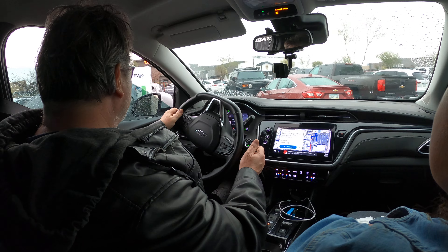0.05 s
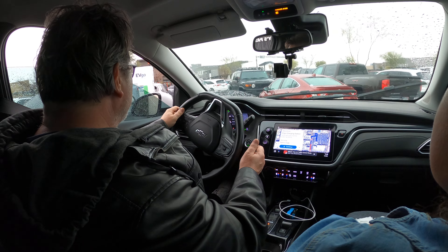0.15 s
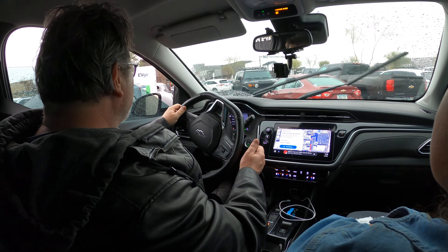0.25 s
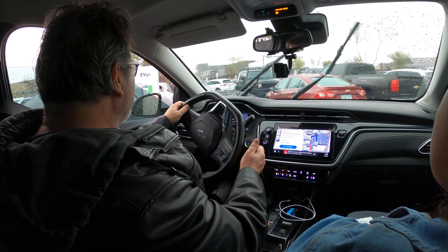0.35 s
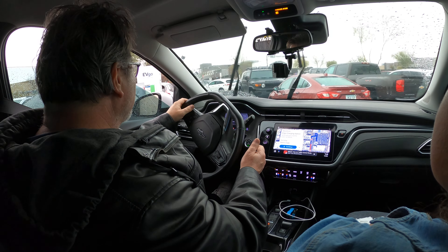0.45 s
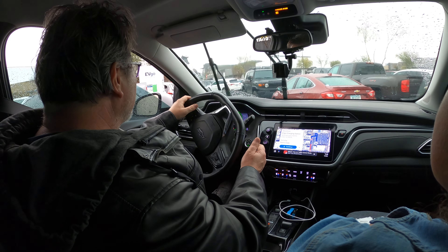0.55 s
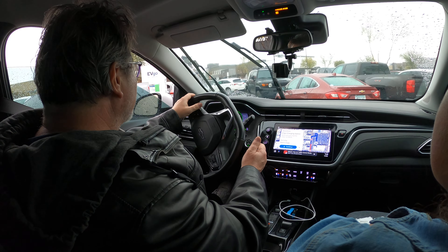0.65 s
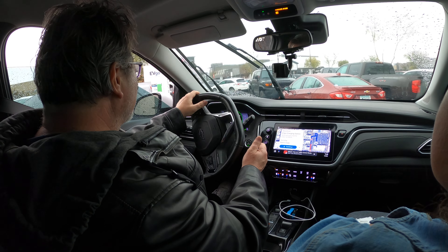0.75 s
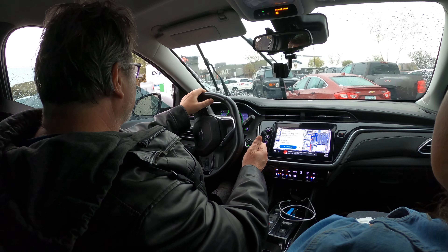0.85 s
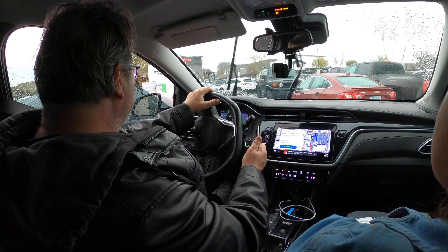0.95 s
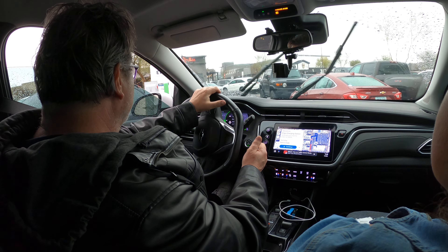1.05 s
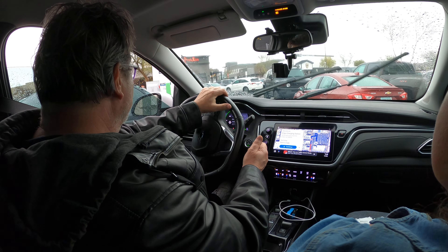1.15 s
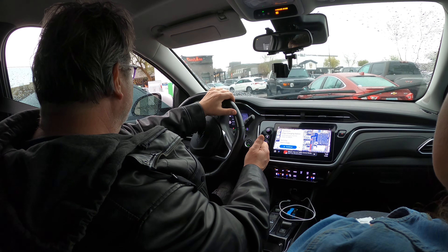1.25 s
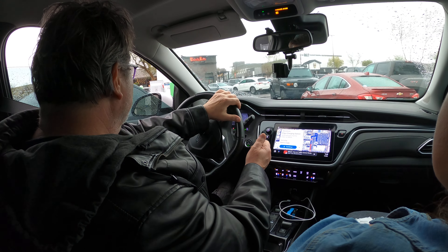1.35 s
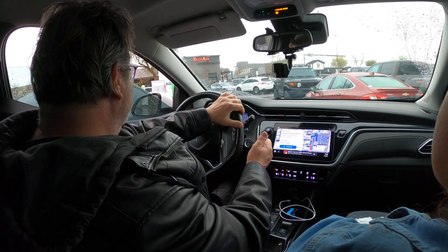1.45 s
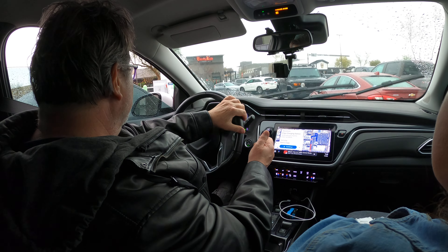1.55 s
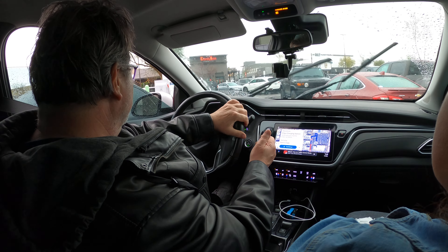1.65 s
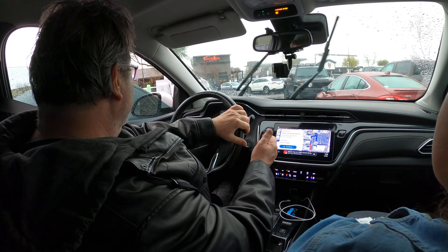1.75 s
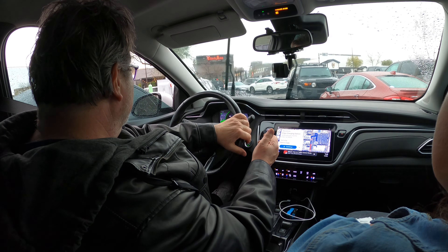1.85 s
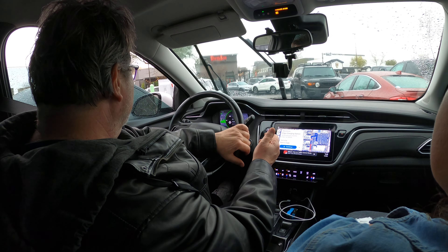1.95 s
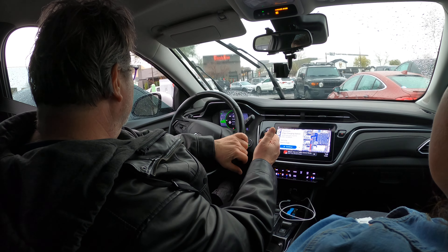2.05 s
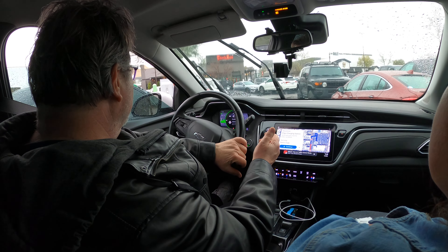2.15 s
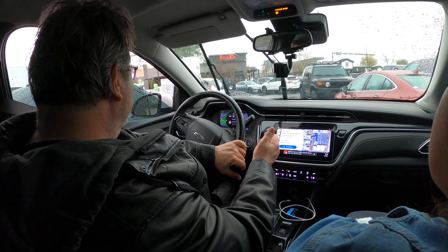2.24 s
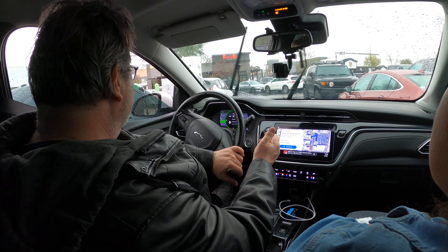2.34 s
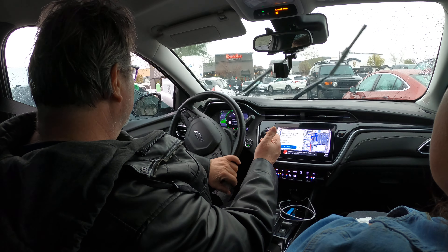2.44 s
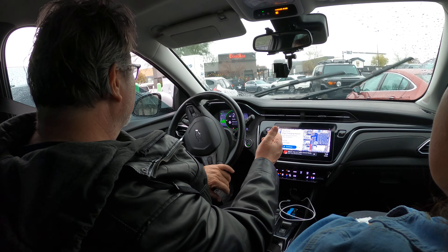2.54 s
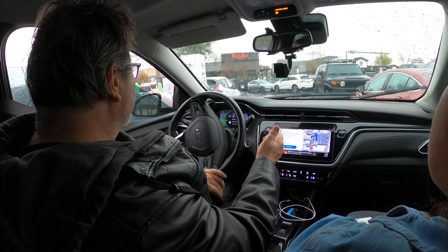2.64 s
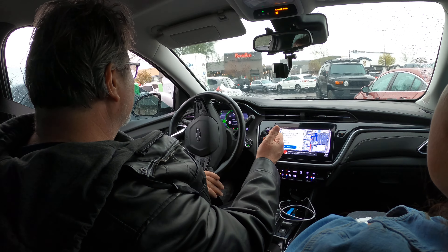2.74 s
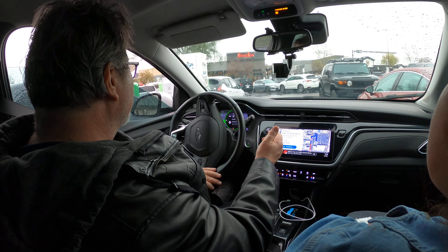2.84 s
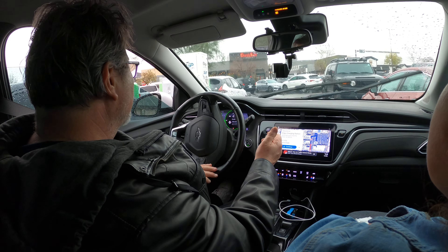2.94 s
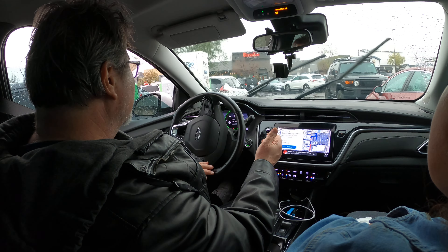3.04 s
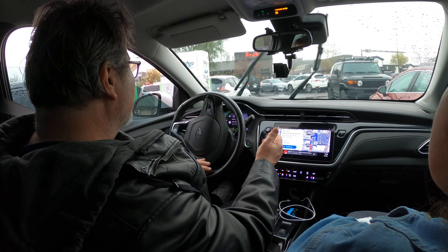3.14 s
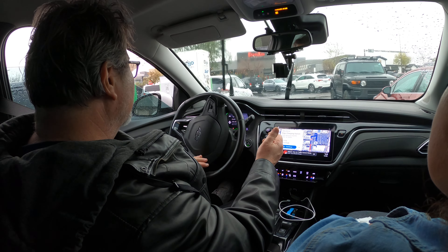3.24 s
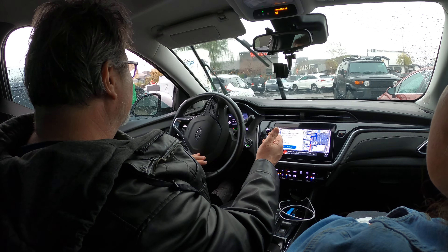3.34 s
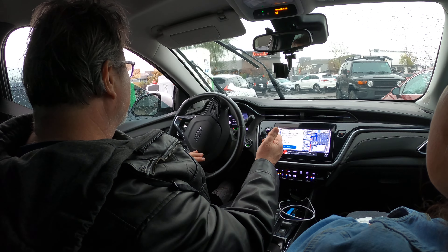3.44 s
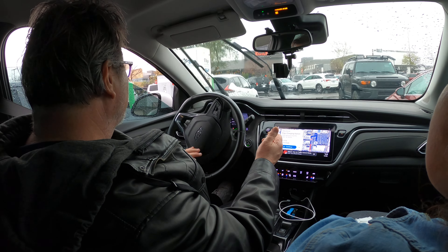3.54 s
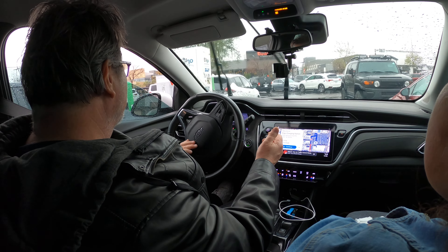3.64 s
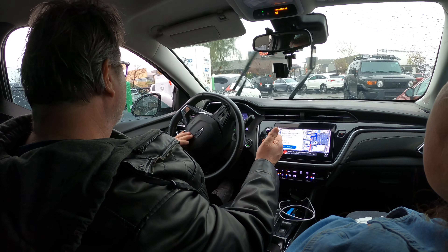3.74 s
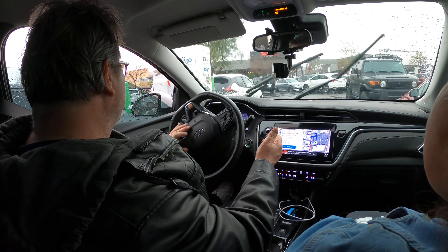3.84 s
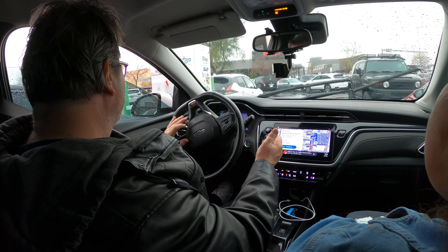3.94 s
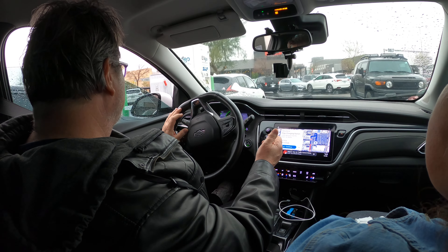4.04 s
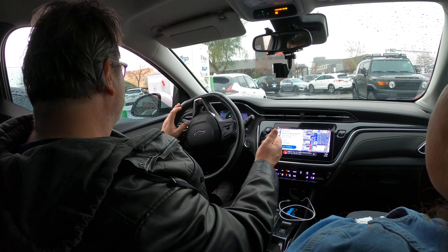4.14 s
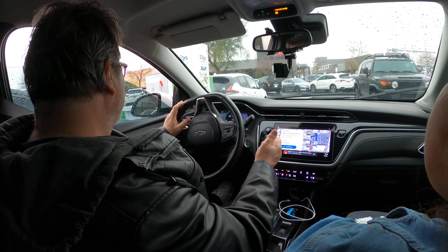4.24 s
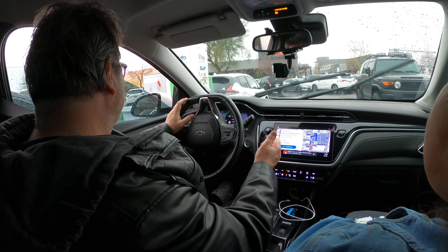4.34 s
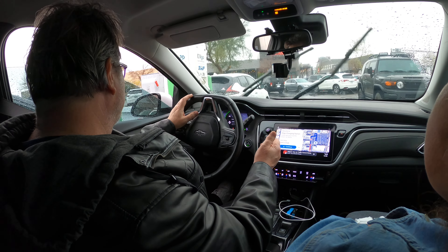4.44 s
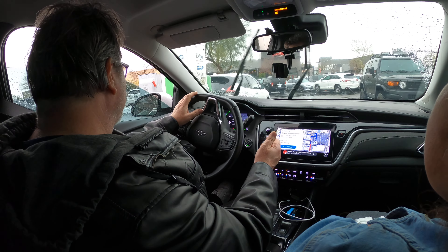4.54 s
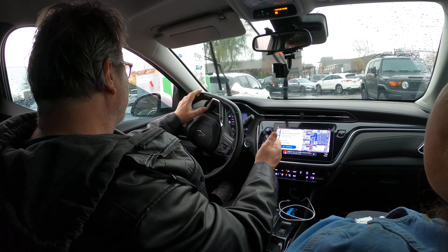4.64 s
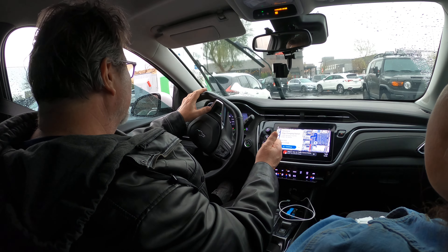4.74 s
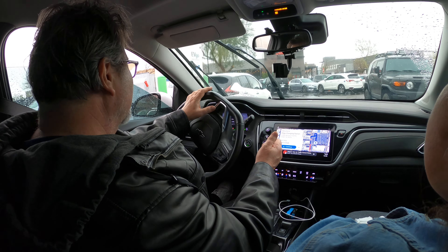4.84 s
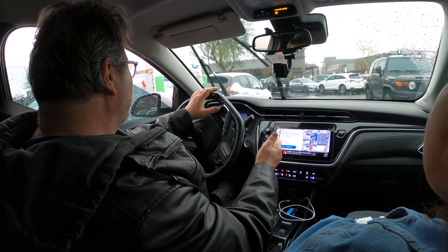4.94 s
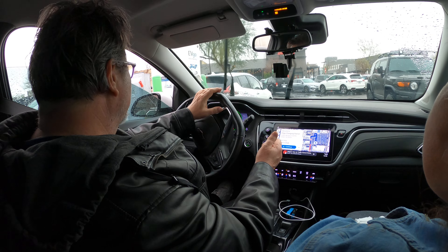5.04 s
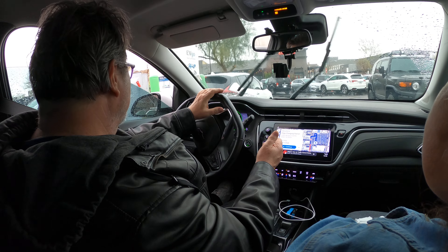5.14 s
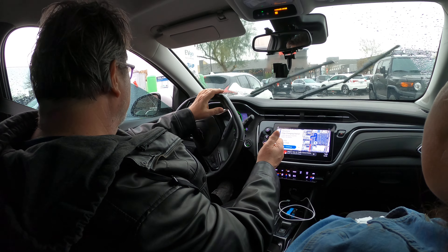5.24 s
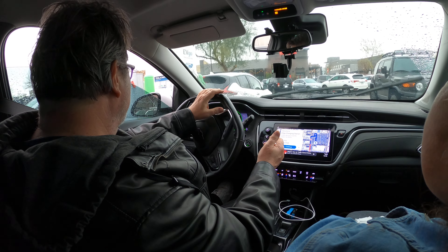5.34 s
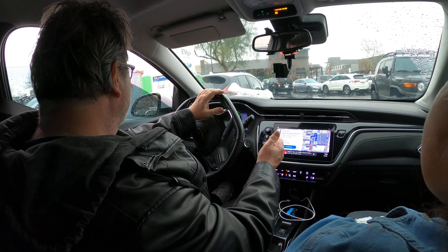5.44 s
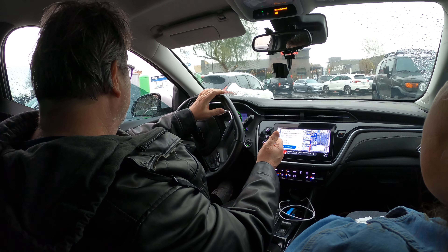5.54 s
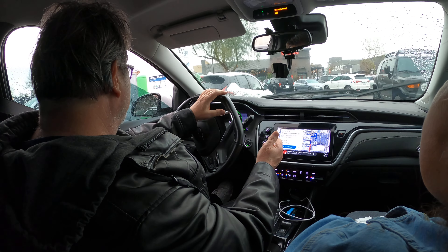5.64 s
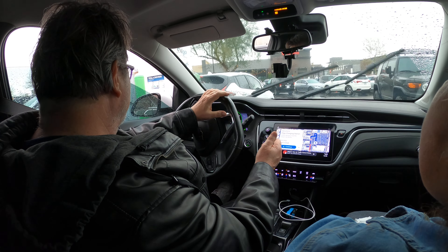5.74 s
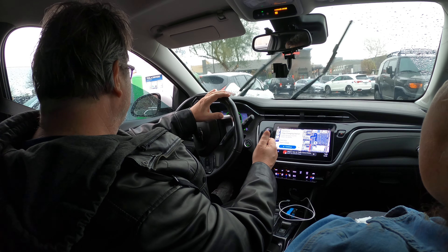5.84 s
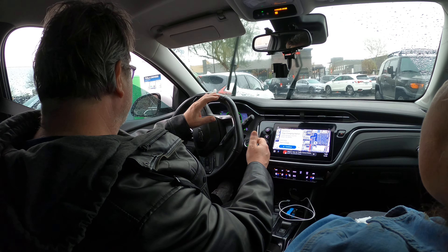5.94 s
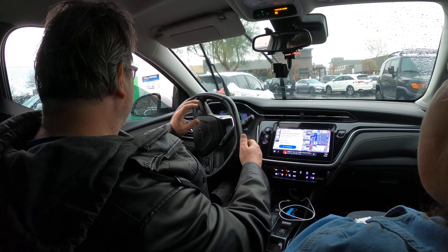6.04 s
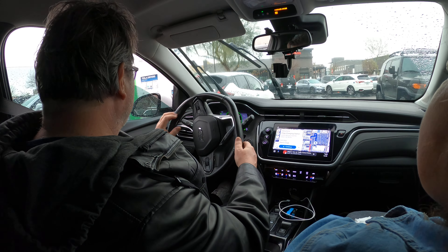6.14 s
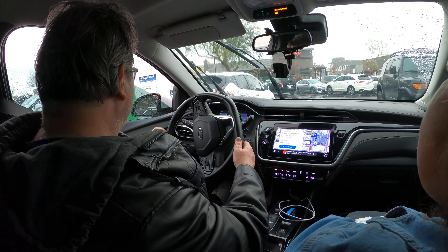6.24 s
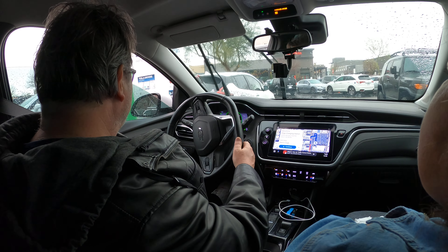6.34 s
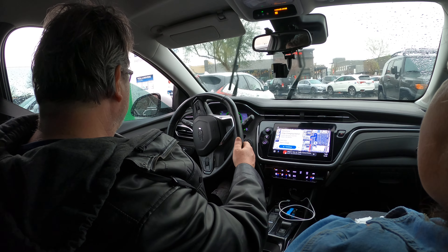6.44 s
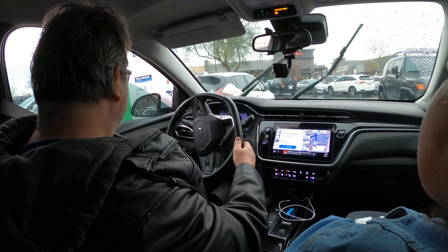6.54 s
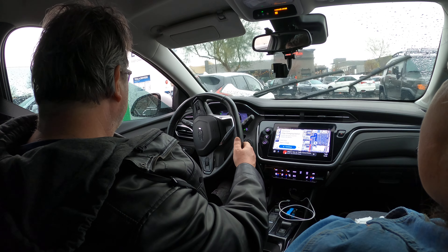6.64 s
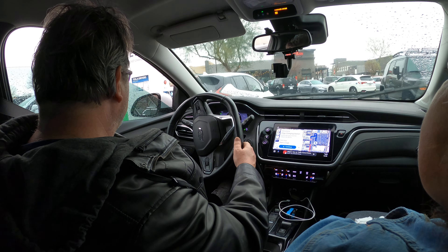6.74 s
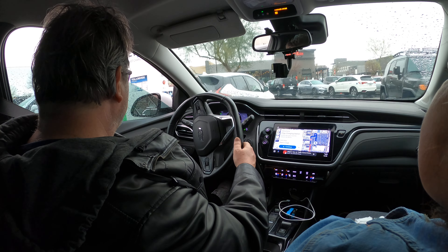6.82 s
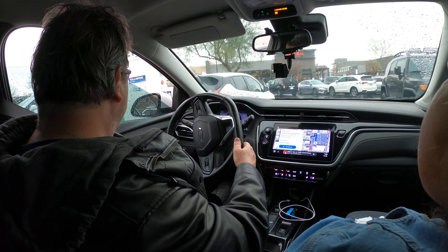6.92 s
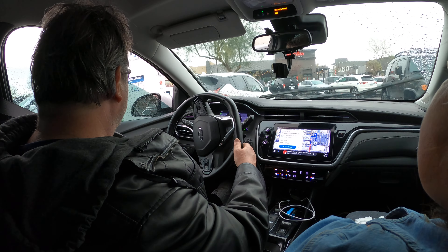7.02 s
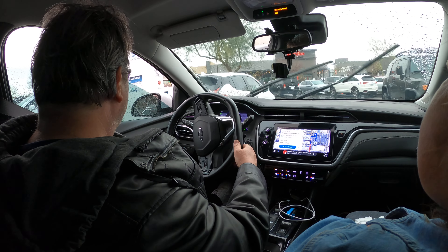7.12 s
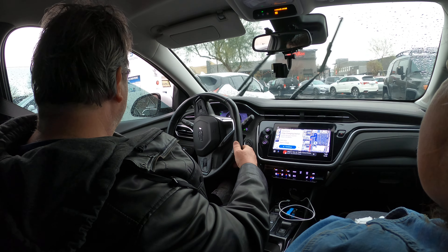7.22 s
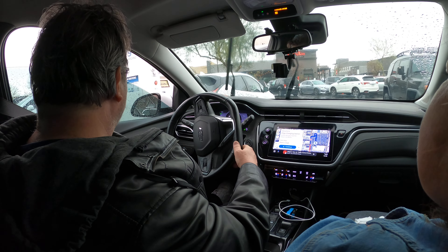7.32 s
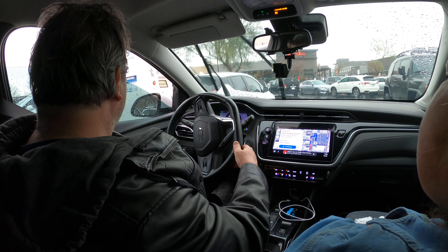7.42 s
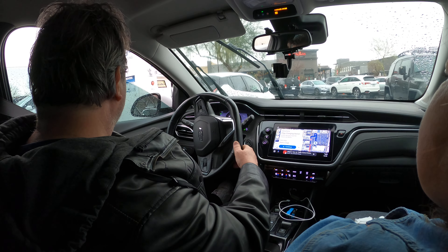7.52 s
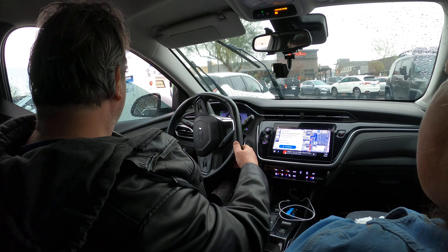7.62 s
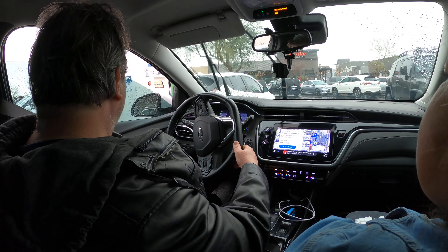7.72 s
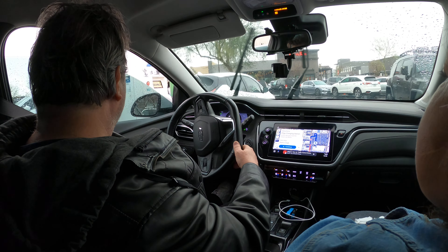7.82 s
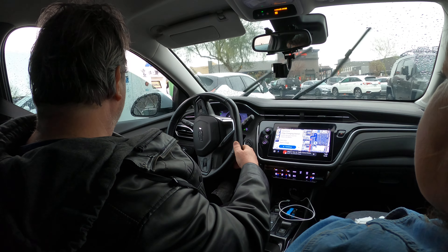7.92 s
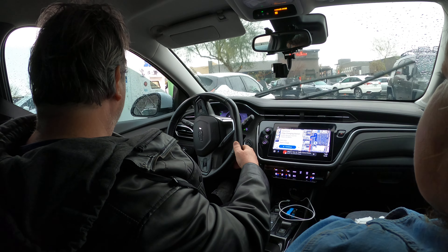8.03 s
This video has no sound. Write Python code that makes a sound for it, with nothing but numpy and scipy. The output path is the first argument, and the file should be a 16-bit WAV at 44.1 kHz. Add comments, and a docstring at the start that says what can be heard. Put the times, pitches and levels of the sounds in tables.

```python
"""A blower and a low road rumble, then a shudder and a drag: wipers at work in an electric car on a wet car park.
The lips stick and slip as they flip over at each upstroke; the drag is noise with a sinking drone.
Drops tick on the windshield, tyres hiss, the indicator ticks, and a sleeve rustles as filtered, grainy noise.
The indicator stalk snaps back just before the last tick. Near the end small clicks and a brake are heard,
then trim chatters and the body booms over a bump; short blows ring each body through its resonances."""
import sys
import numpy as np
from scipy import signal
from scipy.fft import rfft, irfft, next_fast_len
from scipy.io import wavfile
from scipy.ndimage import uniform_filter1d, map_coordinates

SR = 44100
rng = np.random.default_rng(int(sys.argv[2]) if len(sys.argv) > 2 else 0)


def waveform_to_disk(signal):
    """Save audio, clipped to [-1, 1], as 16-bit WAV at the path in sys.argv[1]."""
    frames = np.transpose(np.atleast_2d(signal))
    scaled = np.clip(frames, -1, 1) * 32767
    samples = np.round(scaled).astype(np.int16)
    wavfile.write(sys.argv[1], SR, samples)


N = 356239
T = np.arange(N) / SR  # seconds


def amp(db):
    """Decibels to gain."""
    return 10 ** (np.asarray(db) / 20)


def unit(x):
    """Scale to rms 1."""
    return x / np.sqrt(np.mean(x ** 2) + 1e-20)


def loudest(x, size):
    """Scale x so that its loudest stretch of size samples has rms 1."""
    return x / np.sqrt(uniform_filter1d(x ** 2, size).max())


def along(points, hz):
    """Read (Hz, value) points on a log frequency axis."""
    point_hz, values = np.transpose(points)
    return np.interp(np.log(hz + 1), np.log(point_hz + 1), values)


def curve(rows):
    """One value per sample from (s, value) rows."""
    return np.interp(T, *np.transpose(rows))


def wobble(rate):
    """A smooth random curve with rate knots a second."""
    knots = rng.standard_normal(int(N * rate / SR) + 4)
    return map_coordinates(knots, [T * rate])


def bell(t, half):
    """A smooth swell round t = 0."""
    return np.exp(-(t / half) ** 2 / 2)


def filtered(x, response):
    """x times a complex response of frequency."""
    n = x.shape[-1]
    padded = next_fast_len(n + 8192)  # room for the tail
    hz = np.fft.rfftfreq(padded, 1 / SR)
    return irfft(rfft(x, padded) * response(hz), padded)[..., :n]


def coloured(x, spectrum):
    """x shaped by a (Hz, dB) spectrum."""
    return filtered(x, lambda hz: amp(along(spectrum, hz)))


def ring(x, modes):
    """x through a body's resonances, added with alternating sign."""
    def response(hz):
        total = 0
        for k, (centre, width, db) in enumerate(modes):
            damping = 1j * hz * width
            total = total + (-1) ** k * amp(db) * damping / (centre * centre - hz * hz + damping)
        return total
    return filtered(x, response)


# How alike the two sides of the cabin sound. Each row: frequency in Hz, left-right likeness (1 = identical).
LIKENESS = [(100, .992), (500, .965), (1000, .93), (2000, .8), (4000, .55), (8000, .35)]


def cabin_noise(size):
    """White noise at two microphones: alike in the bass, diffuse in the treble."""
    def mid_and_side(hz):
        turn = np.arccos(np.clip(along(LIKENESS, hz), -1, 1)) / 2
        return np.array([np.cos(turn), np.sin(turn)])
    mid, side = filtered(rng.standard_normal((2, size)), mid_and_side)
    return np.array([mid + side, mid - side])


def add(out, s, x):
    """Mix x into out from time s."""
    i = max(round(s * SR), 0)
    out[..., i:i + x.shape[-1]] += x[..., :max(N - i, 0)]


def panned(x, pan_db):
    """x with the left side pan_db above the right."""
    return x * amp([[pan_db / 2], [-pan_db / 2]])


def strike(modes, rise, t60, cabin_db, cabin_t60, blow_db):
    """A clean blow, its rough contact and the scatter round the cabin ring a body; the loudest 5 ms have rms 1."""
    t = T[:SR // 5]
    contact = amp(-60 * np.maximum(t - rise, 0) / t60)
    scatter = amp(cabin_db - 60 * t / cabin_t60)
    shape = np.minimum(t / rise, 1) * (contact + scatter)
    force = cabin_noise(len(t)) * shape
    force[:, np.argmax(shape)] += amp(blow_db) * np.linalg.norm(shape)  # the clean blow, at the peak
    return loudest(ring(force, modes), size=SR // 200)


# The road's steady rumble. Each row: time in seconds, level in dB.
ROAD_LEVEL = [(0.05, -39.5), (1.4, -34), (2.5, -31), (3.4, -31.5), (4.6, -34), (6.25, -38.5), (6.8, -33.5),
              (7.6, -38)]
# Tone of the rumbling body. Each row: frequency in Hz, relative level in dB per Hz.
RUMBLE_TONE = [(10, -6.5), (27, -1), (42, 1), (60, -7.5), (90, -20), (160, -12.5), (500, -105)]
# The tyres roll over uneven tarmac. Each row: time of the peak in seconds, level in dB.
ROAD_JOLTS = [(.61, -34.5), (1.17, -31.5), (1.788, -32), (2.29, -28.5), (3.3, -34)]


def rumble():
    """The body rumbles with the road, swelling at each jolt and as the wiper linkage turns round."""
    jolts = sum(amp(db) * bell(T - s, half=0.031) for s, db in ROAD_JOLTS)
    sway = sum(amp(-35) * bell(T - s, half=0.076) for s, _ in WIPER_STROKES)
    level = amp(curve(ROAD_LEVEL)) + jolts + sway
    return level * unit(coloured(cabin_noise(N), RUMBLE_TONE))


# Tone of the blown air. Each row: frequency in Hz, relative level in dB per Hz.
BLOWER_TONE = [(50, -23), (90, -2), (125, -2), (150, -3.5), (190, 4.5), (260, -9), (400, -14.5),
               (600, -22.5), (950, -21.5), (1150, -25.5), (1750, -28.5), (2300, -37.5), (5000, -67.5),
               (9000, -87)]
# Resonances of the air ducts. Each row: frequency in Hz, width in Hz, relative level in dB.
DUCT_MODES = [(197, 11.6, 3), (419, 15, -15.5), (637, 6.5, -16), (780, 52, -15.5), (1349, 117, -18)]


def blower():
    """Air noise that wavers slowly in level, over steady noise ringing the ducts."""
    air = amp(-36.0 + 0.79 * wobble(3.592)) * unit(coloured(cabin_noise(N), BLOWER_TONE))
    ducts = amp(-43.5) * unit(ring(cabin_noise(N), DUCT_MODES))
    return air + ducts


# The wet tyres. Each row: time in seconds, hiss level in dB.
HISS_LEVEL = [(0, -66), (2.6, -65), (4.0, -65.5), (6.0, -66), (6.5, -65.5), (7.15, -64.5), (7.35, -90),
              (7.65, -69), (8.08, -51.5)]
# Tone of the hiss. Each row: frequency in Hz, relative level in dB per Hz.
HISS_TONE = [(600, -27.5), (1500, 2), (3000, 7), (4500, 2.5), (5800, 1.5), (7700, -6), (8400, -10),
             (10000, -25.5), (14000, -24)]


def tyres():
    """The wet hiss of the tyres: noise made slightly grainy by a fast random level."""
    grainy = cabin_noise(N) * amp(2.9 * wobble(130))
    return amp(curve(HISS_LEVEL)) * unit(coloured(grainy, HISS_TONE))


# Heavier drops on glass and roof; the one at 0.791 is part of the indicator's tock.
# Each row: start in seconds, level in dB, ring in Hz.
HEAVY_DROPS = [(0.613, -52, 2780), (0.791, -46, 2600), (1.084, -56.5, 2520), (2.1793, -55.5, 3800),
               (2.7978, -50, 3100), (3.4372, -52, 3860), (3.5997, -50.5, 2620), (5.122, -53, 3540),
               (5.33, -57, 5460), (5.516, -51.5, 2490), (6.977, -53, 3020), (7.222, -61, 5500)]
# What every drop rings. Each row: frequency in Hz, width in Hz, relative level in dB.
PANE_MODES = [(1500, 600, -7.5), (2880, 1100, -1.5), (7500, 1200, -13)]


def rain():
    """A few heavy drops among many faint ones; each spot of the pane adds its own ring."""
    out = np.zeros((2, N))
    faint = [(u * N / SR, -70 + 13 * v ** 2, 3000 + 3000 * w) for u, v, w in rng.random((60, 3))]
    for s, db, hz in list(HEAVY_DROPS) + faint:
        drop = strike([(hz, 1500, 0)] + PANE_MODES,
                      rise=.0012, t60=0.03, cabin_db=-6.5, cabin_t60=0.1, blow_db=-4)
        add(out, s, amp(db) * drop)
    return out


# The blade holders knock in their play. Each row: start in seconds, level in dB, ring in Hz.
HOLDER_KNOCKS = [(0.209, -27.5, 454), (0.222, -33, 514), (0.268, -32.5, 790), (0.284, -30.5, 520),
                 (0.302, -28.5, 433), (1.620, -30, 483), (1.661, -30, 600), (1.67, -35, 1030),
                 (1.682, -30.5, 710), (2.952, -30.5, 520), (2.960, -38, 577), (2.988, -34, 377),
                 (3.041, -35.5, 920), (4.326, -35.5, 478), (4.333, -38, 990), (4.357, -34, 640),
                 (5.690, -29, 470), (5.741, -29.5, 640), (5.769, -27.5, 422), (5.786, -34.5, 600),
                 (7.061, -35.5, 540), (7.072, -41, 1010), (7.089, -28.5, 497), (7.109, -37, 1270),
                 (7.111, -38, 945)]
# Resonances of a holder. Each row: frequency in Hz, width in Hz, relative level in dB.
HOLDER_MODES = [(307, 115, -3.5), (566, 90, -15)]


def holder_knocks():
    """Loose blade holders are struck at the foot of the glass, each knock with its own ring."""
    out = np.zeros((2, N))
    for s, db, hz in HOLDER_KNOCKS:
        knock = strike([(hz, 70, 0)] + HOLDER_MODES,
                       rise=.005, t60=0.016, cabin_db=-17.5, cabin_t60=0.067, blow_db=-0.5)
        add(out, s, amp(db) * knock)
    return out


# Resonances of the windshield. Each row: frequency in Hz, width in Hz, relative level in dB.
GLASS_MODES = [(124, 30.1, 3.5), (163, 51.5, 3), (225.3, 30, 3.5), (398.8, 13, -17), (476, 23, -19),
               (680, 35, -24.5), (1000, 120, -31)]
# The wiper arm rocks. Each row: frequency in Hz, width in Hz, relative level in dB.
ARM_MODES = [(82, 42.4, -1.5), (124, 36, 0.5)]
# Tone of rubber on wet glass. Each row: frequency in Hz, relative level in dB per Hz.
SCRAPE_TONE = [(150, -28.5), (330, 1), (500, 0), (750, -1.5), (1000, -0.5), (1400, -5.5), (2200, -12.5),
               (4000, -19.5), (6000, -29.5), (9000, -65.5)]
LEAD_S = .1  # room for the swell ahead of each roll-over


def shudder(roll_s, slip_hz, slowing, jitter, scatter_db, arm_db):
    """The lip sticks and slips ever more slowly as it rolls over; each slip knocks the glass and scrapes."""
    t = T[:SR // 3] - LEAD_S
    swell = np.where(t < 0, bell(t, roll_s), np.exp(-np.abs(t) / (1.64 * roll_s)))
    rate = slip_hz * np.exp(-slowing * np.tanh(t / roll_s / 2))
    slips = np.flatnonzero(np.diff(np.floor(np.cumsum(rate) / SR + rng.random())))
    timing, strength = rng.standard_normal((len(t), 2))[:len(slips)].T
    shift = (timing * jitter * SR / slip_hz).astype(int)
    pulses = np.zeros(len(t))
    pulses[np.clip(slips + shift, 0, len(t) - 1)] = amp(scatter_db * strength)
    force = pulses - rate / SR  # builds up while the lip sticks, lets go as it slips
    rubber_tone = [(600, -2.0), (1500, -14), (5000, -18.0), (9000, -44.5)]  # a soft contact: (Hz, dB)
    knock = loudest(ring(coloured(force * swell, rubber_tone), GLASS_MODES), size=SR // 50)
    rock = loudest(ring(rng.standard_normal(len(t)) * swell, ARM_MODES), size=SR // 50)
    scuffs = signal.lfilter([1], [1, -np.exp(-1 / (0.0031 * SR))], pulses)  # each slip fades over 3.1 ms
    # steady wet rubbing fills the gaps at 0.75 of one slip; the scuff peaks 1.4 ms before the thud
    grit = (scuffs + 0.75) * bell(t + 0.0014, 0.94 * roll_s)
    scrape = loudest(coloured(cabin_noise(len(t)) * grit, SCRAPE_TONE), size=SR // 70)
    return knock + amp(arm_db) * rock, scrape


# A rubber lip flips over at the foot of the glass. Each row: time in seconds, thud level in dB,
# roll-over time in seconds, slip rate in Hz at that time, scrape level in dB.
LIP_FLIPS = [(0.230, -18, 0.013, 186, -41.5), (0.273, -18, 0.018, 134.5, -42),
             (0.305, -22.5, 0.0097, 218.6, -38.5), (1.594, -20.5, 0.014, 192, -46.5),
             (1.621, -15.5, 0.013, 150.3, -35), (1.648, -23.5, .006, 168.8, -42),
             (1.683, -15, .011, 149.5, -37), (2.964, -18, 0.0093, 189.9, -42),
             (2.989, -17.5, .013, 129.9, -40.5), (3.051, -20.5, 0.0076, 160.5, -42.5),
             (4.333, -19.5, 0.0083, 166, -45), (4.353, -19, 0.014, 134.9, -39),
             (5.721, -14.5, .016, 190.7, -40), (5.752, -18.5, 0.013, 150.1, -37.5),
             (5.788, -23.5, 0.013, 176.7, -40.5), (5.815, -23.5, 0.0072, 161.2, -55),
             (7.076, -20, 0.0095, 184.7, -43), (7.097, -14, .012, 149.5, -39.5),
             (7.123, -19.5, 0.0099, 127.9, -44)]


def lip_flips():
    """Rubber lips flip over in stuttering thuds, each with a wet scrape."""
    out = np.zeros((2, N))
    for s, db, roll_s, slip_hz, scrape_db in LIP_FLIPS:
        thud, scrape = shudder(roll_s, slip_hz, slowing=.25, jitter=0.076, scatter_db=2.5, arm_db=-7.5)
        add(out, s - LEAD_S, amp(db) * thud + amp(scrape_db) * scrape)
    return out


def drone(t, start_hz, fall, waver):
    """The blade's judder sinks in pitch as it speeds up."""
    hz = start_hz * np.exp(-fall * t + waver * wobble(45))
    return np.sin(2 * np.pi * np.cumsum(hz) / SR) * amp(3 * wobble(60))


# Tone of the dragging blade. Each row: frequency in Hz, relative level in dB per Hz.
DRAG_TONE = [(30, -33), (68, 3.5), (100, -8), (128, -9), (165, -13.5), (215, -6.5), (280, -27.5),
             (500, -31), (1200, -70), (4000, -84.5)]
# The blades drag up the glass. Each row: start in seconds, level in dB before the attack and fade.
WIPER_STROKES = [(0.292, -26), (1.696, -30), (3.005, -25.5), (4.376, -25.5), (5.786, -28.5), (7.128, -29)]


def blade_drag():
    """The blades rub and drone more and more softly on the way up the glass."""
    out = np.zeros((2, N))
    rise_s, fade_db_per_s = 0.0086, 42.5
    rubbing = unit(coloured(cabin_noise(N), DRAG_TONE))
    for s, db in WIPER_STROKES:
        t = np.maximum(T - s, 0)
        pressure = amp(db - fade_db_per_s * t) * np.minimum(t / rise_s, 1)
        judder = amp(1.0) * drone(t, start_hz=149.9, fall=.85, waver=0.07)
        out += pressure * (rubbing + judder)
    return out


# The indicator. Each row: start in seconds, level in dB before the pulse's own level.
INDICATOR_TICKS = [(0.399, -43), (0.784, -45.5), (1.151, -43.5), (1.517, -46), (1.894, -44)]
# The pulses within a tick. Each row: seconds after the tick, level in dB relative to the tick.
TICK_PULSES = [(0, -4.5), (.0052, -1.5), (0.0112, -7.5)]
# Resonances of every tick. Each row: frequency in Hz, width in Hz, relative level in dB.
TICK_MODES = [(3766, 70, 6.5), (4040, 110, 2.5), (4400, 160, -7), (5030, 180, -10), (7730, 200, -15),
              (9430, 200, -19)]
# Every second tick also rings these. Each row: frequency in Hz, width in Hz, relative level in dB.
TOCK_MODES = [(2560, 106, -3.5), (2850, 110, -10), (5000, 190, -0.5)]


def indicator():
    """Dry ticks and tocks in turn; each is a quick run of three dry pulses through resonances."""
    out = np.zeros((2, N))
    for k, (s, db) in enumerate(INDICATOR_TICKS):
        modes = TICK_MODES + TOCK_MODES if k % 2 else TICK_MODES
        for after_s, pulse_db in TICK_PULSES:
            pulse = strike(modes, rise=0.0016, t60=0.022, cabin_db=-20.5, cabin_t60=0.13, blow_db=-8.5)
            add(out, s + after_s, amp(db + pulse_db) * pulse)
    return panned(out, -1.5)


# Sleeve and palm rub on the wheel. Each row: middle in seconds, half length in seconds, level in dB.
WHEEL_RUBS = [(1.474, 0.12, -59.5), (2.459, 0.053, -56.5), (2.62, .04, -54.5), (2.721, 0.032, -51),
              (2.838, 0.097, -59.5), (6.305, 0.1, -57.5), (6.936, 0.043, -60.5)]
# Tone of the leather. Each row: frequency in Hz, relative level in dB per Hz.
LEATHER_TONE = [(1000, 0), (2400, -7), (3500, -6), (4600, -6), (7700, -12.5), (9000, -12), (13000, -17.5)]


def sleeve():
    """Leather slides over the wheel in a dense grainy rustle."""
    speed = sum(amp(db) * bell(T - s, half) for s, half, db in WHEEL_RUBS)
    grain = amp(3.2 * wobble(350) + 1.5 * wobble(45))
    return speed * unit(coloured(cabin_noise(N) * grain, LEATHER_TONE))


# The cancelling cam scrapes past. Each row: frequency in Hz, relative level in dB per Hz.
RASP_TONE = [(400, -18), (1500, 2), (3500, -7), (5500, -10), (8000, -15), (13000, -25.5)]
# The stalk snaps back and rattles. Each row: start in seconds, level in dB, added ring in Hz,
# that ring's relative level in dB.
STALK_SNAPS = [(1.786, -24, 494, 22), (1.791, -33.5, 2610, 0), (1.809, -32, 666, 12),
               (1.827, -31.5, 690, 13.5), (1.841, -50, 1670, -3), (1.858, -44, 1340, 2)]
# Resonances of the stalk. Each row: frequency in Hz, width in Hz, relative level in dB.
STALK_MODES = [(860, 300, 0), (1290, 220, 0), (1700, 250, 0.5), (1950, 140, 2), (2600, 260, -1.5),
               (3300, 580, -8), (4150, 370, -9), (5270, 370, -11), (6900, 1000, -24.5)]


def stalk():
    """The turning wheel drags its cam past the indicator stalk, which snaps back and rattles."""
    grainy = cabin_noise(N) * amp(2.5 * wobble(500))
    out = amp(-45) * bell(T - 1.800, half=0.018) * unit(coloured(grainy, RASP_TONE))
    for s, db, hz, ring_db in STALK_SNAPS:
        snap = strike([(hz, 70, ring_db)] + STALK_MODES,
                      rise=0.0018, t60=0.044, cabin_db=-10.5, cabin_t60=0.22, blow_db=-7)
        add(out, s, amp(db) * snap)
    return out


# Small plastic clicks. Each row: start in seconds, level in dB, added ring in Hz,
# that ring's relative level in dB, contact's 60 dB fade in seconds.
PLASTIC_CLICKS = [(6.539, -36, 3140, 4, .028), (6.612, -37.5, 5540, 22, 0.0071),
                  (6.6232, -38, 1200, 22, 0.025)]
# Resonances of the plastic. Each row: frequency in Hz, width in Hz, relative level in dB.
PLASTIC_MODES = [(1600, 530, -1.5), (4370, 900, -8), (5850, 1100, -4.5), (6940, 1200, -7), (9050, 970, -9),
                 (11400, 910, -10.5)]


def clicks():
    """Something small and plastic clicks near the dashboard: short blows on a stiff little body."""
    out = np.zeros((2, N))
    for s, db, hz, ring_db, t60 in PLASTIC_CLICKS:
        click = strike([(hz, 400, ring_db)] + PLASTIC_MODES,
                       rise=0.00054, t60=t60, cabin_db=-13.5, cabin_t60=0.087, blow_db=-10)
        add(out, s, amp(db) * click)
    return panned(out, 2)


# Resonances of the rubbing brake. Each row: frequency in Hz, width in Hz, relative level in dB.
BRAKE_MODES = [(3020, 200, 0), (5170, 160, 0), (5560, 150, -2)]
# The squeak's resonance. Each row: frequency in Hz, width in Hz, relative level in dB.
SQUEAK_MODES = [(1680, 120, 0)]


def brake(rub_s=7.61, squeak_s=7.657):
    """A brake rubs thinly and breaks into one faint, hoarse squeak."""
    rub = amp(-66.5) * bell(T - rub_s, 0.08) * unit(ring(cabin_noise(N), BRAKE_MODES))
    hoarse = unit(ring(ring(cabin_noise(N), SQUEAK_MODES), SQUEAK_MODES))  # rung twice for a narrower pitch
    return rub + amp(-47.0) * bell(T - squeak_s, 0.02) * hoarse


# Loose trim chatters. Each row: start in seconds, level in dB, ring in Hz.
TRIM_CLACKS = [(7.7223, -29, 2060), (7.727, -30.5, 1110), (7.732, -30, 1980), (7.744, -38, 1910)]
# Resonances of the trim. Each row: frequency in Hz, width in Hz, relative level in dB.
TRIM_MODES = [(388, 40, 7.5), (920, 110, -2), (1140, 82, 4), (1500, 150, -8.5), (1740, 180, -4),
              (1950, 130, 3.5), (2870, 180, -25), (3950, 500, -27)]
# Tone of the tyres in water. Each row: frequency in Hz, relative level in dB per Hz.
SPLASH_TONE = [(40, 21), (70, 27), (120, 11), (200, 14.5), (400, -11), (700, -21), (1400, -5), (2200, -9.5),
               (4000, -15), (8000, -20)]


def bump(drop_s=7.766, water_s=7.755, rise_s=0.01):
    """Trim chatters, the body booms on its springs and the tyres swish through water."""
    chatter = np.zeros((2, N))
    for s, db, hz in TRIM_CLACKS:
        clack = strike(TRIM_MODES + [(hz, 100, 3)],
                       rise=0.0018, t60=0.027, cabin_db=-12, cabin_t60=0.12, blow_db=-8.5)
        add(chatter, s, amp(db) * clack)
    t = np.maximum(T - drop_s, 0)
    boom = np.sin(2 * np.pi * 27.5 * t) * (1 - np.exp(-t / .025)) * amp(-10 - 60 * t / .62)
    swish = np.clip((T - water_s) / rise_s, 0, 1) * amp(-32.5 - 20 * t)
    splash = swish * unit(coloured(cabin_noise(N), SPLASH_TONE))
    return panned(chatter, 1.5) + boom + splash


def scene():
    """Everything as heard from between the seats."""
    car = rumble() + blower() + tyres()
    wipers = holder_knocks() + lip_flips() + blade_drag()
    controls = indicator() + sleeve() + stalk() + clicks()
    return car + rain() + wipers + controls + brake() + bump()


# The treble leans right. Each row: frequency in Hz, level in dB added on the right and taken off the left.
RIGHT_LEAN = [(1000, 0), (2200, -0.5), (4500, -0.1), (8000, 0.1), (12000, 3)]


def record(dry):
    """The left microphone hears one sample later and duller; the top octave rolls off up to a band limit."""
    side = np.array([[-1], [1]])  # left, right

    def placement(hz):
        half_sample_shift = np.exp(2j * np.pi * hz * side * .5 / SR)
        return amp(side * along(RIGHT_LEAN, hz)) * half_sample_shift
    pair = filtered(dry, placement)
    dulled = coloured(pair, [(7600, 0), (8600, -8.5), (13000, -24.0)])
    return filtered(dulled, lambda hz: hz < 14100)


dry = scene()
out = record(dry)
waveform_to_disk(out)
```